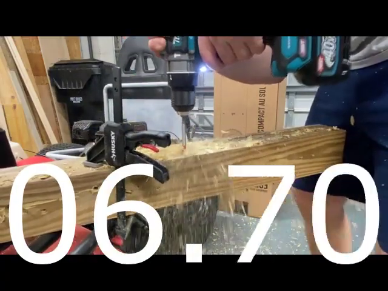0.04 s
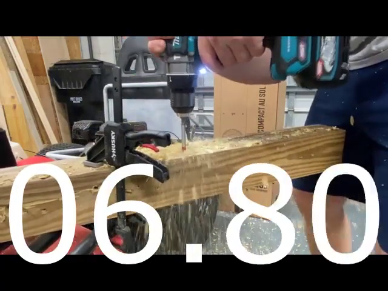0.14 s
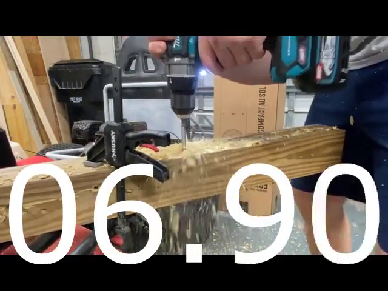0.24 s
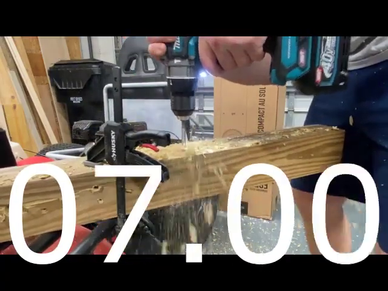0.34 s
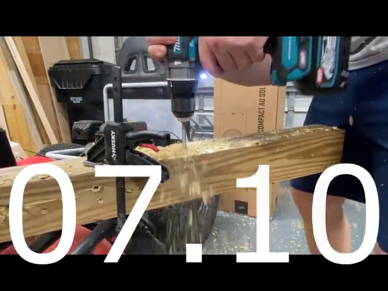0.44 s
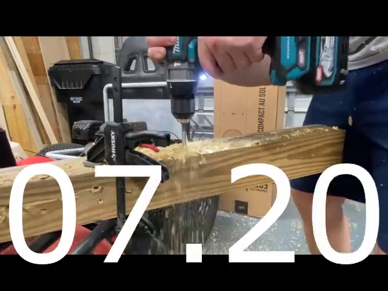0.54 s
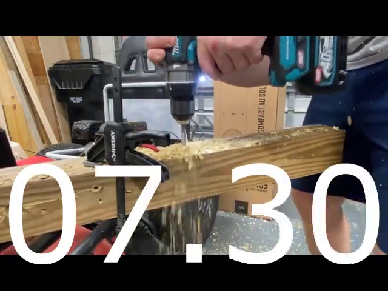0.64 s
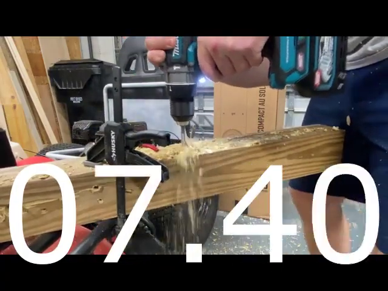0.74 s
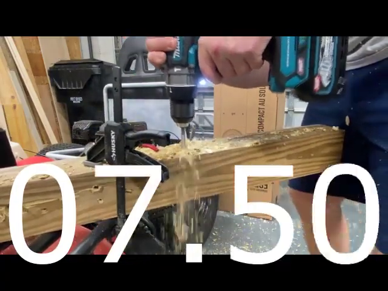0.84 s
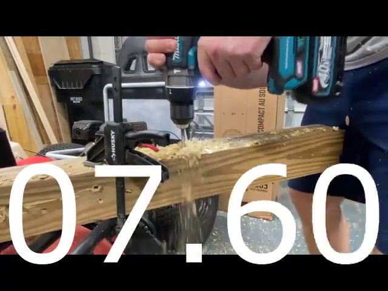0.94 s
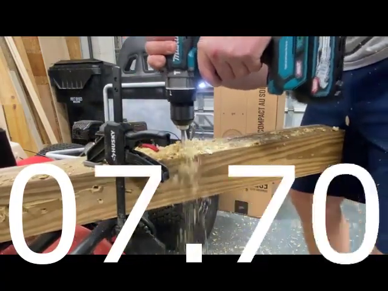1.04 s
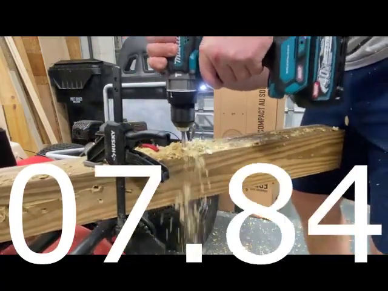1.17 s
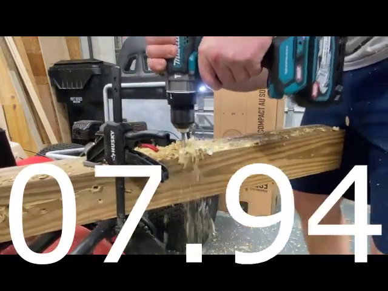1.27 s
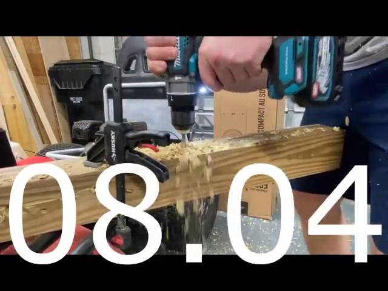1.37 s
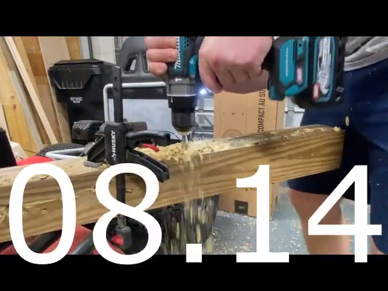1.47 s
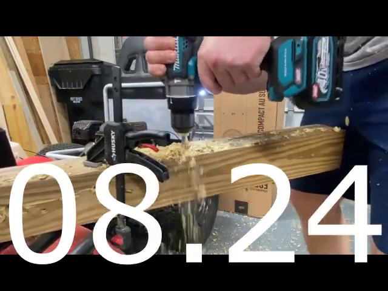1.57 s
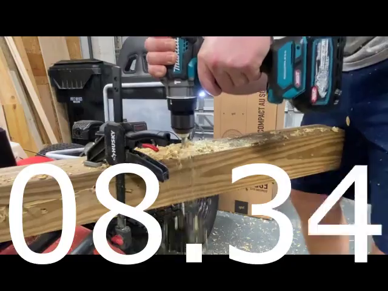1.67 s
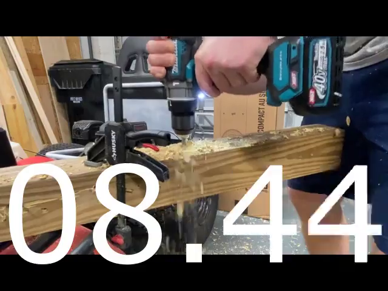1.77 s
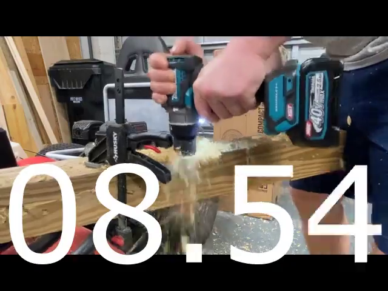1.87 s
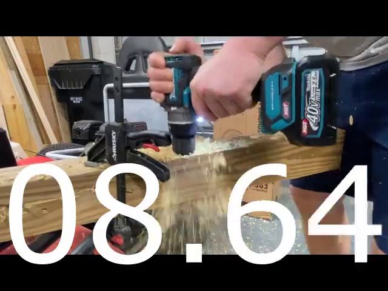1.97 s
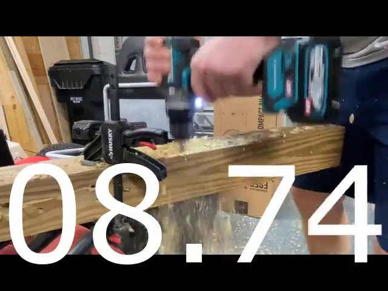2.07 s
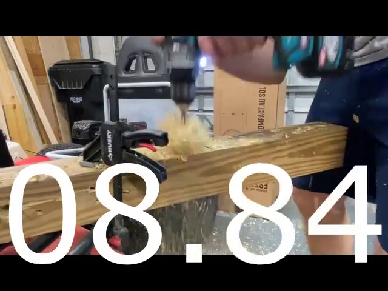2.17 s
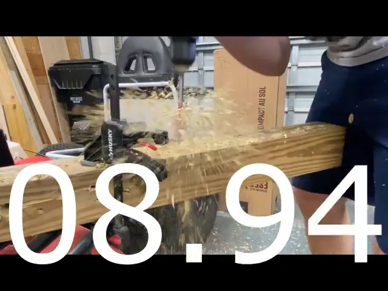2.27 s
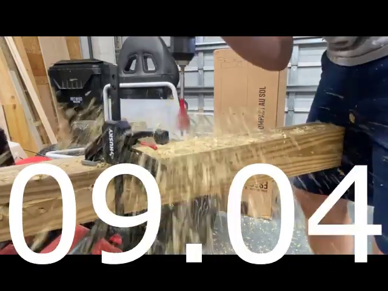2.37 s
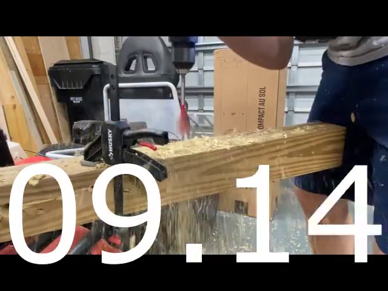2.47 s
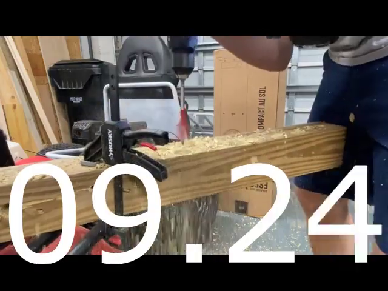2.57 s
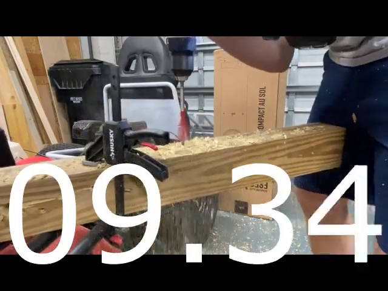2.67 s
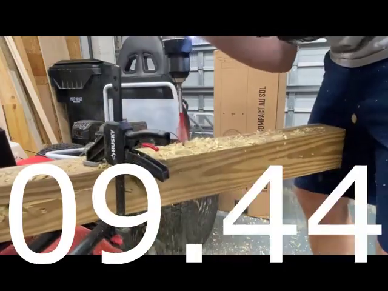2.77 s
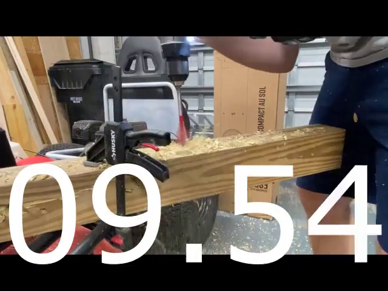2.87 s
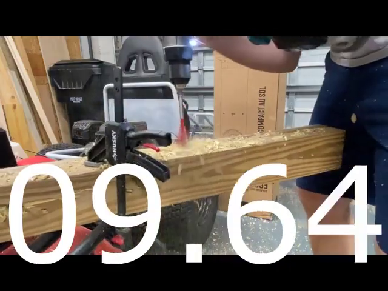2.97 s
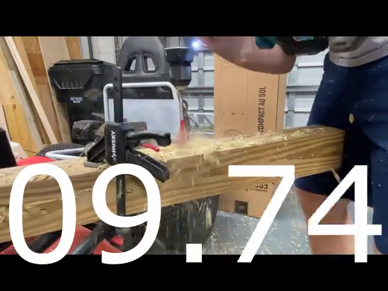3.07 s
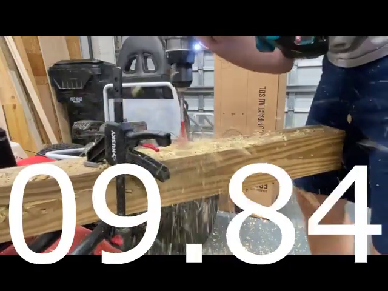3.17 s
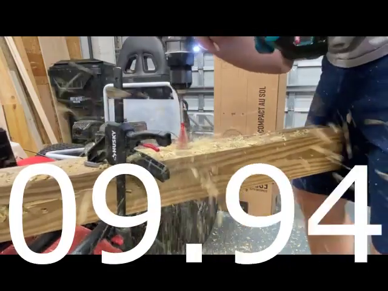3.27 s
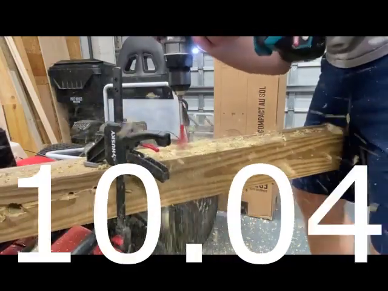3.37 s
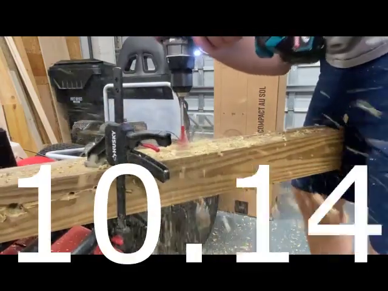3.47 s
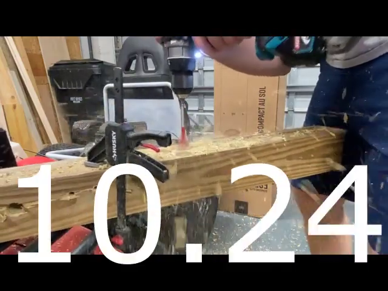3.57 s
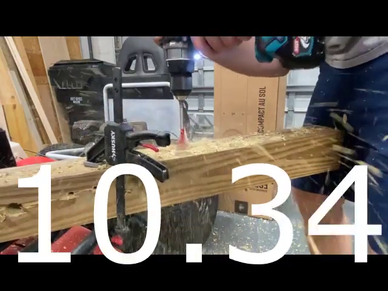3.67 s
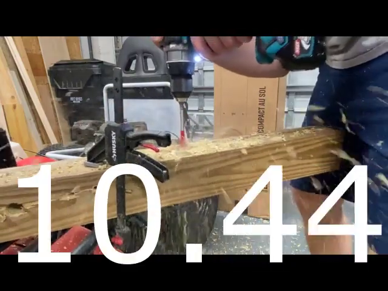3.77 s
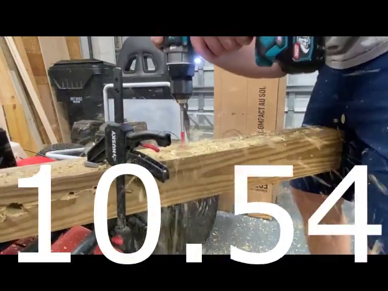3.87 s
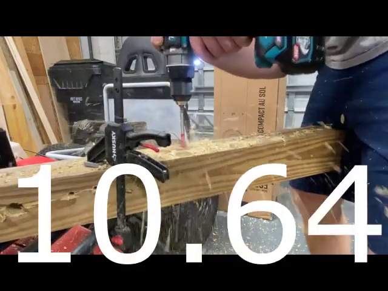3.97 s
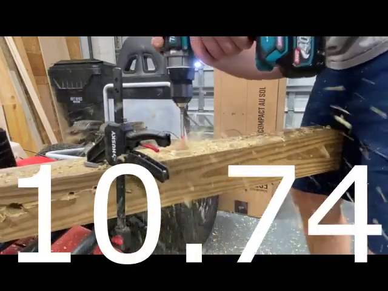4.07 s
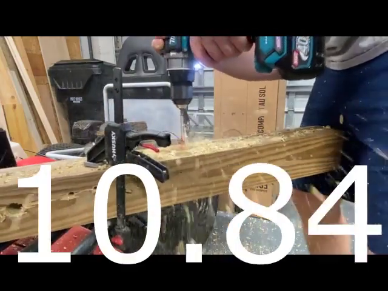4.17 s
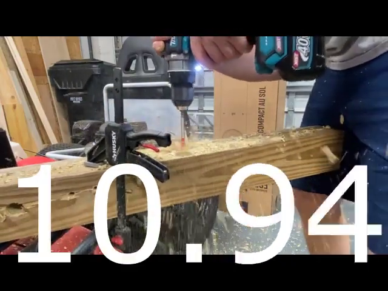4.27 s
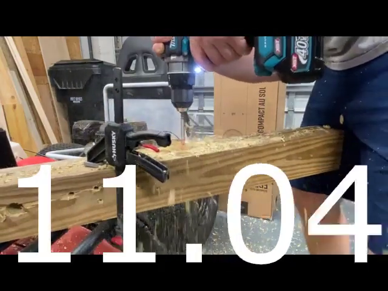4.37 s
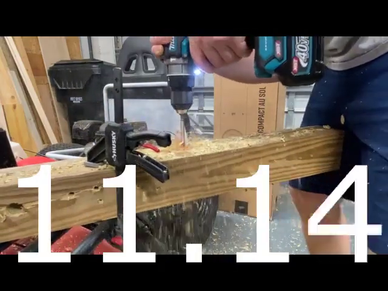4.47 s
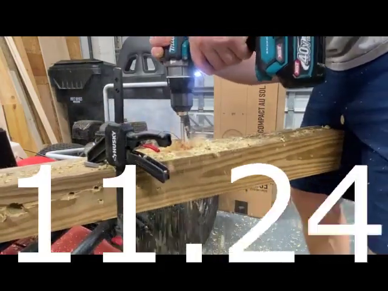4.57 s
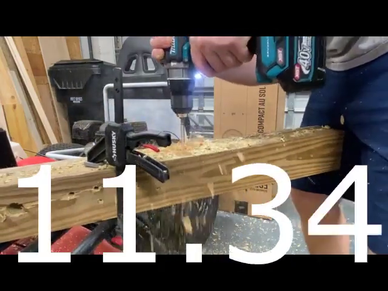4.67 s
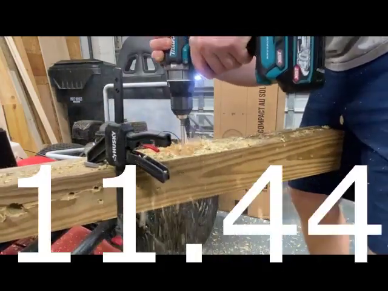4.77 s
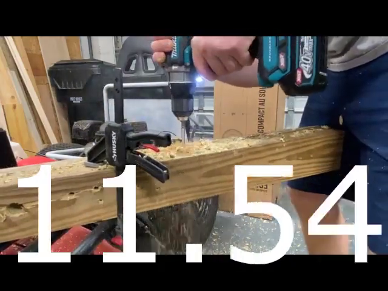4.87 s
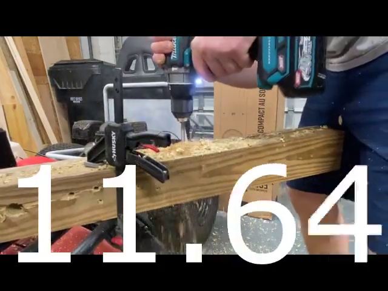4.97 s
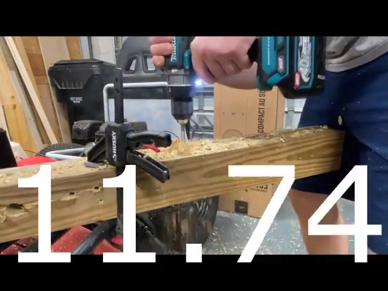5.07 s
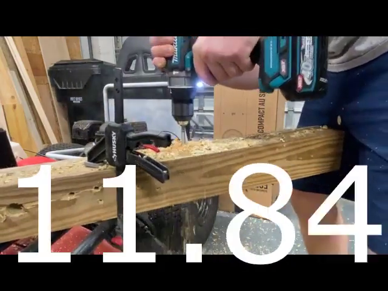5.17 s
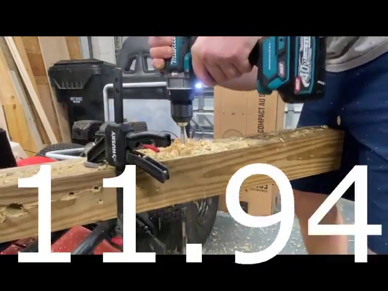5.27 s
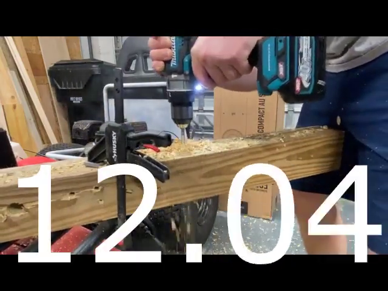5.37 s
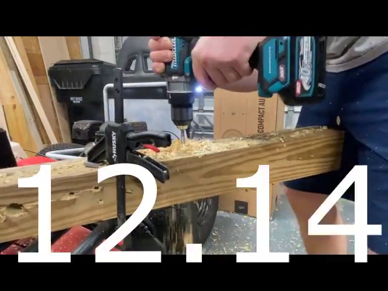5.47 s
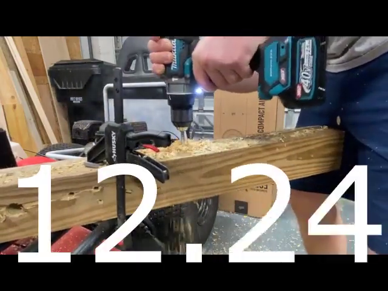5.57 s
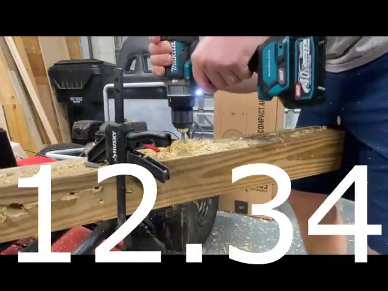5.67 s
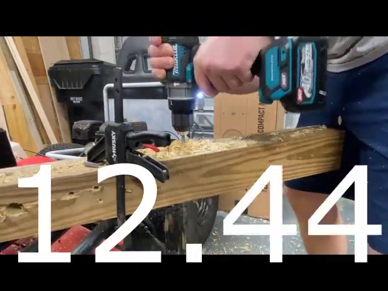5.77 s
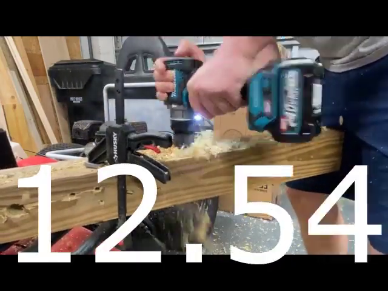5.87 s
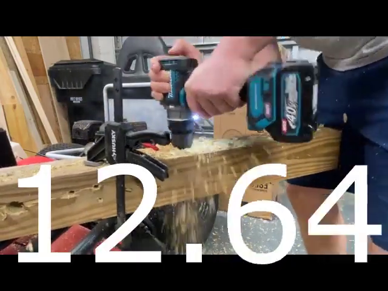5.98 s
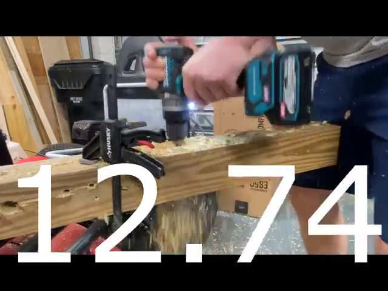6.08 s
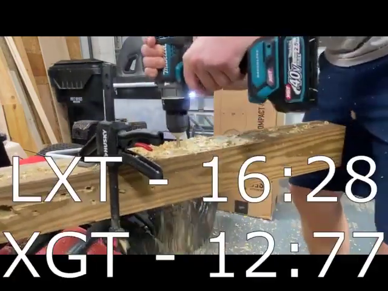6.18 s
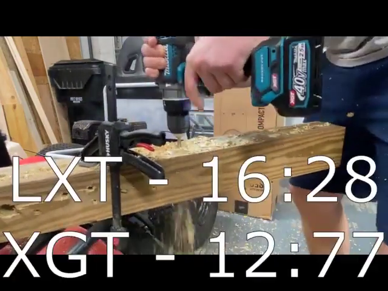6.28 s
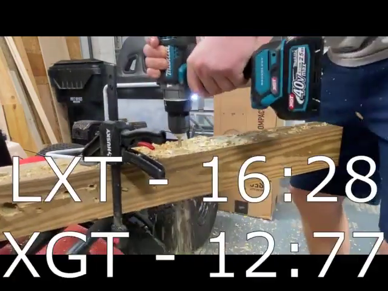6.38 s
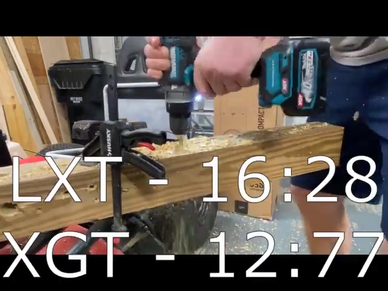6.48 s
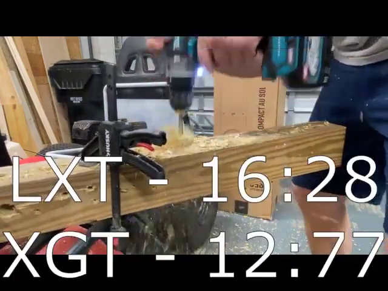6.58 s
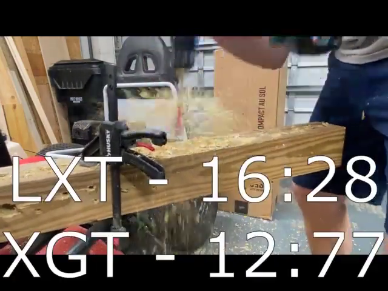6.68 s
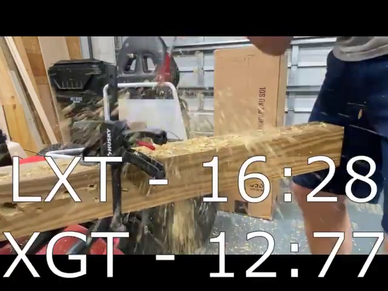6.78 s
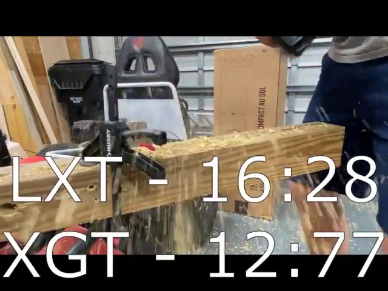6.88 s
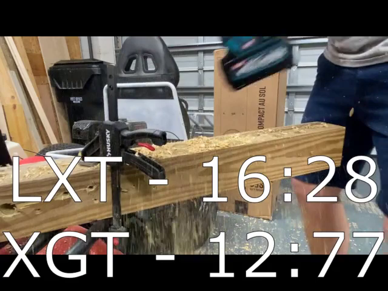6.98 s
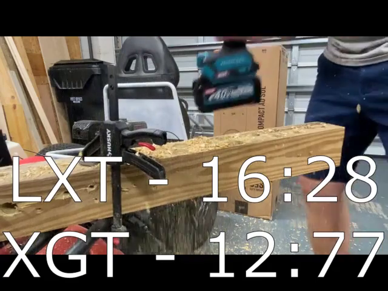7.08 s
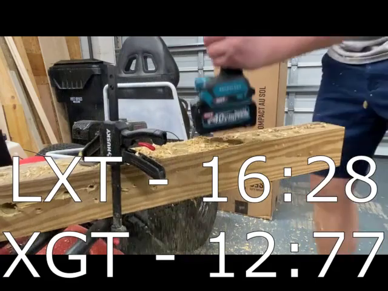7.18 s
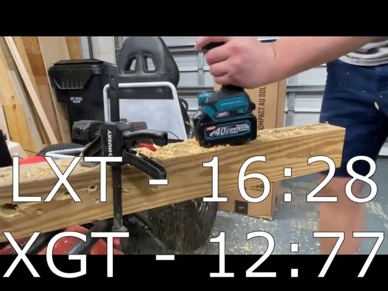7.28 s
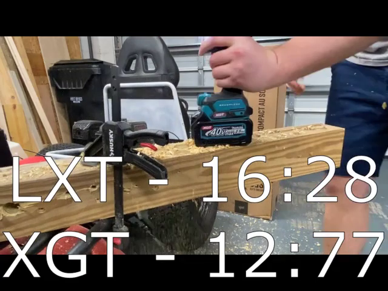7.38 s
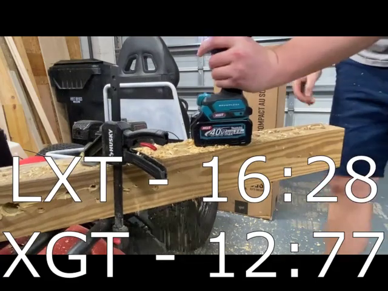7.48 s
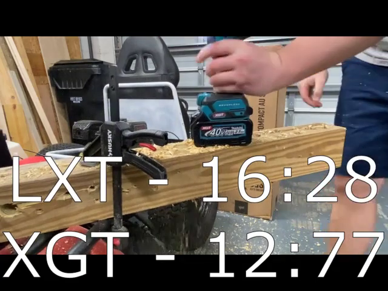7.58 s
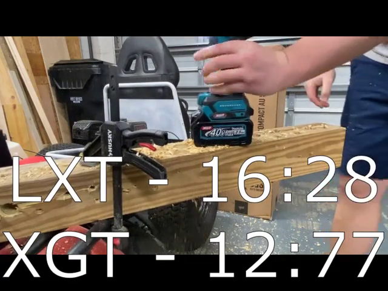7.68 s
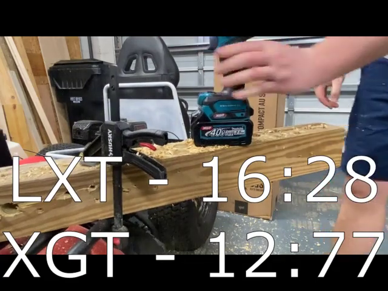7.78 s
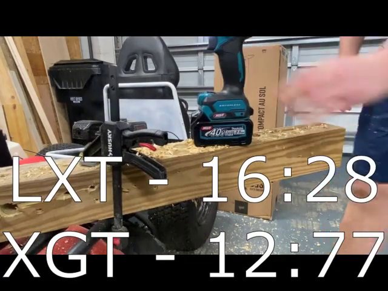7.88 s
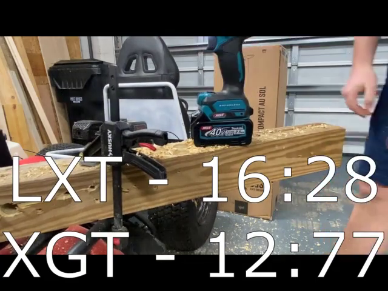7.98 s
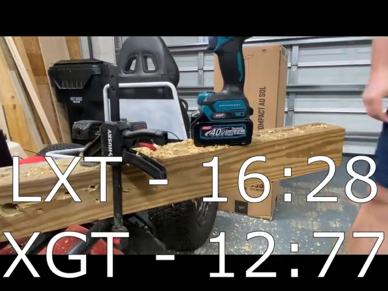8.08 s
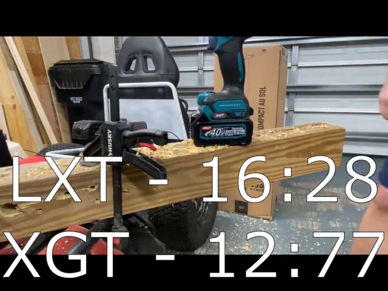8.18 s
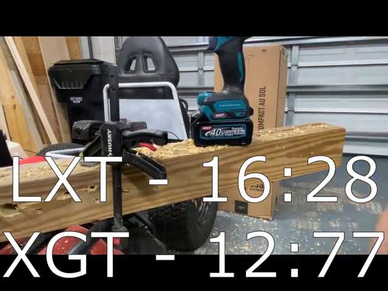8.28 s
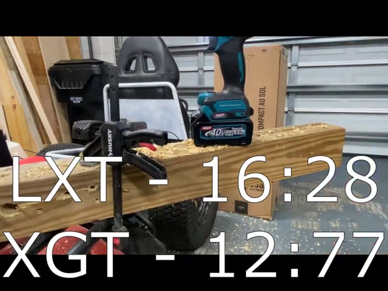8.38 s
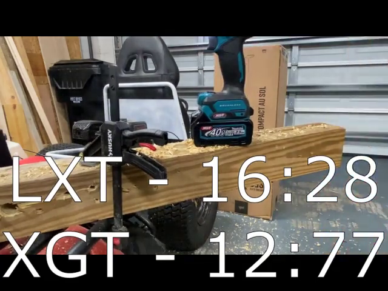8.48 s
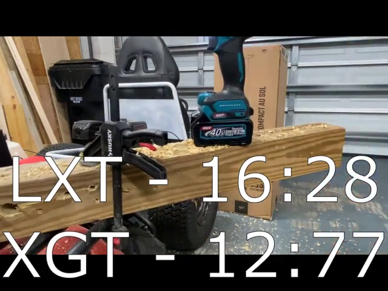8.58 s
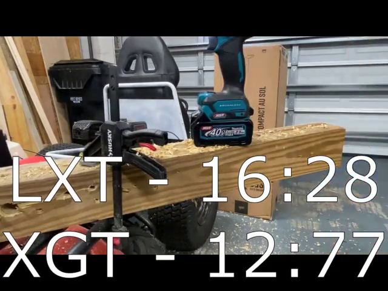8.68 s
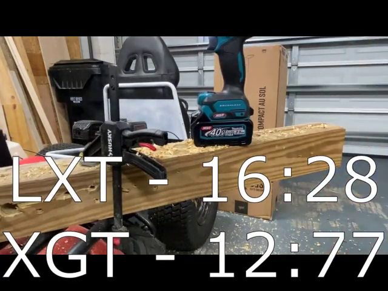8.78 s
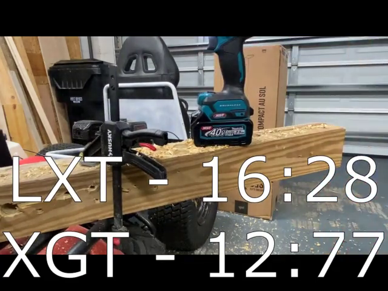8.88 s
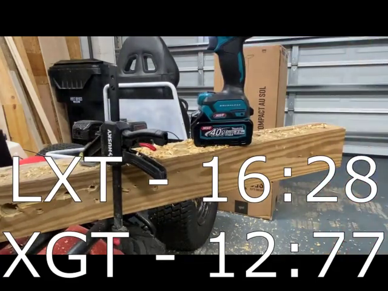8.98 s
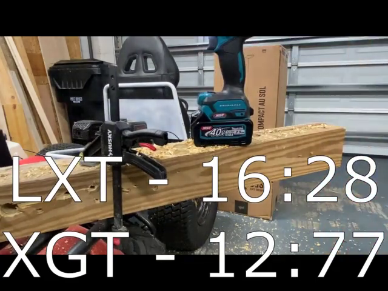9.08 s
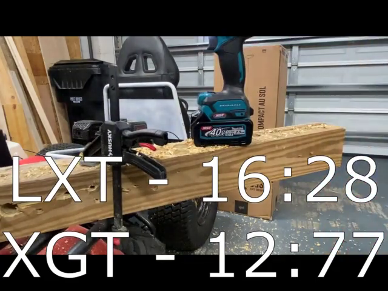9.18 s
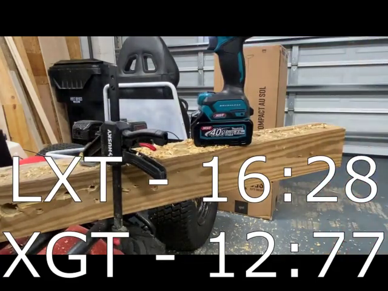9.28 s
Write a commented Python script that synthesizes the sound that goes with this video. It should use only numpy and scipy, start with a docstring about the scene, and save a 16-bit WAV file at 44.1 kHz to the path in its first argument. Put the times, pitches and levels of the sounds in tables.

```python
"""Cordless drill in a garage

A drill bores through a clamped wooden beam twice, the first hole already begun, close to an overloaded
microphone. Motor and gear tones follow one shaft angle, and the gears whine as load drags the motor down.
Crackling noise through wood resonances is the cutting, and the chatter at breakthrough and withdrawal.
Then the drill is stood on the beam in filtered knocks, and shoes scuff away in swells of gritty noise."""
import sys
import numpy as np
from scipy import signal
from scipy.fft import rfft, irfft, next_fast_len
from scipy.io import wavfile
from scipy.ndimage import uniform_filter1d

SR = 44100
rng = np.random.default_rng(int(sys.argv[2]) if len(sys.argv) > 2 else 0)


def log_audio(samples):
    """Write samples as a 16-bit WAV file to the path given in sys.argv[1]."""
    # one column per channel
    frames = np.atleast_2d(samples).T
    # limit to full scale, then quantise
    limited = np.clip(frames, -1, 1)
    pcm = np.round(limited * 32767).astype(np.int16)
    wavfile.write(sys.argv[1], SR, pcm)


N = 411453
T = np.arange(N) / SR


def amp(db):
    """Decibels to gain."""
    return 10 ** (np.asarray(db) / 20)


def unit(x):
    """Scales to rms 1."""
    return x / np.sqrt(np.mean(x ** 2) + 1e-20)


def read(points, hz):
    """Reads a curve on a log-frequency axis."""
    f, value = np.transpose(points)
    return np.interp(np.log(hz + 1), np.log(f + 1), value)


def add(mix, s, sound):
    """Mixes a sound in at a time."""
    part = mix[max(round(s * SR), 0):][:len(sound)]
    part += sound[:len(part)]


def colour(x, spectrum, rings=()):
    """Filters by a broad spectrum with resonances standing on it; rms 1."""
    size = next_fast_len(N + SR)
    f = np.fft.rfftfreq(size, 1 / SR)
    peaks = 1
    for hz, width, db in rings:
        peaks = peaks + amp(db) ** 2 / (1 + (2 * (f - hz) / width) ** 2) ** 0.91447
    filtered = rfft(x, size) * amp(read(spectrum, f)) * np.sqrt(peaks)
    return unit(irfft(filtered, size)[:N])


def band(x, hz, spread, order=3):
    """A broad causal band around hz."""
    edges = [hz / (1 + spread), min(hz * (1 + spread), SR / 2 - 2000)]
    return signal.sosfilt(signal.butter(order, edges, "band", fs=SR, output="sos"), x)


def wander(rate_hz):
    """Smooth chance of rms 1."""
    lowpass = signal.butter(2, rate_hz, fs=SR, output="sos")
    return unit(signal.sosfilt(lowpass, rng.standard_normal(N)))


def grains(per_s, spread_db):
    """Random impulses, most small and a few large."""
    size = amp(spread_db * np.minimum(rng.exponential(1, N), 4)) * rng.standard_normal(N)
    return unit(size * (rng.random(N) < per_s / SR))


def swell(s, rise, fall, db):
    """A gain that climbs to its peak at s and dies away."""
    climb = np.maximum((s - T) / rise, 0) ** 4
    decay = np.maximum((T - s) / fall, 0) ** 2
    return amp(db) * np.exp(-climb - decay)


# the two holes, the first already begun:
# (start [s], end [s], relative cutting level [dB], relative gear whine level [dB])
HOLES = [(-2, 1.785, -5.5, -13.3), (2.905, 5.772, -5.2, -15)]
BITE_S, LET_GO_S = 0.02596, 0.028  # the edges sink in, and come free


def in_wood(start, end):
    """One while the edges cut a hole, ramping to zero outside."""
    return np.clip((T - start) / BITE_S, 0, 1) * np.clip((end - T) / LET_GO_S, 0, 1)


# decay of the room by pitch: (frequency [Hz], t60 [s])
GARAGE_DECAY = [(150, 0.8795), (500, 0.58944), (1500, 0.7178), (4000, 0.47208), (8000, 0.43977),
                (15000, 0.32)]


def reverb(x):
    """One diffuse tail from the hard walls, the treble dying first."""
    hz, t, z = signal.stft(rng.standard_normal(SR), SR, nperseg=256)
    decay = amp(-60 * t / read(GARAGE_DECAY, hz)[:, None])
    tail = signal.istft(z * decay, SR, nperseg=256)[1]
    # silent for the first 3 ms, then a quick ramp
    tail = tail * np.clip((np.arange(len(tail)) / SR - .003) / 0.0024, 0, 1)
    middle = abs(rfft(tail, SR)[500:6000])  # one bin per Hz; sets the tail's gain
    return signal.oaconvolve(x, tail / np.sqrt(np.mean(middle ** 2)))[:N]


def garage(x, count=3):
    """The drill and the person move, so the paths to the walls keep changing: several tails take turns."""
    walls = np.zeros(N)
    for k in range(count):
        walls += reverb(x * np.cos(np.pi * (2 * T + k / count)))
    return walls / np.sqrt(count / 2)


# spectrum of the still air: (frequency [Hz], relative density [dB per Hz])
AIR_SPECTRUM = [(15, -31.5), (25, -1.5), (75, -13.5), (126, -20.5), (221, -13.5), (267, -22.5),
                (322, -20.5), (598, -19.5), (1380, -33.5), (5280, -35), (15500, -53)]
# low rumbles as the person shifts and walks off: (time [s], rise [s], fall [s], relative level [dB])
RUMBLES = [(7.0, .15, 0.5856, -41), (9.15, 0.3047, 0.4577, -46)]


def background(air_db=-55, still_db=-49, shake_db=-38.5, hum_db=-45.5):
    """Still air, a low rumble that grows while the bit shakes the beam, and a low hum that comes up at the end."""
    air = amp(air_db) * colour(rng.standard_normal(N), AIR_SPECTRUM)
    low_spectrum = [(5, -6.0), (20, 5.0), (45, -6), (90, -12), (160, -28), (400, -56)]
    low = colour(rng.standard_normal(N), low_spectrum)
    # a narrow band of noise, so the hum wavers
    hum_spectrum = [(60, -40), (78, -8), (85, -1.5), (92, -9.5), (120, -45), (400, -90.5)]
    hum = colour(rng.standard_normal(N), hum_spectrum)
    shaking = amp(still_db) + amp(shake_db) * sum(in_wood(*hole[:2]) for hole in HOLES)
    shaking = shaking + sum(swell(*row) for row in RUMBLES)
    return air + shaking * low + amp(hum_db) * hum * np.clip((T - 8.7) / 0.375, 0, 1)


# scrapes of battery and shoes:
# (time [s], rise [s], fall [s], relative level [dB], centre [Hz], relative half-width [ratio])
SCUFFS = [(7.21, 0.029, 0.0783, -39.5, 2548, 1), (7.22, 0.02335, .09, -39, 140, .9),
          (7.21, 0.01446, 0.05774, -37, 624.4, 0.353), (7.295, 0.01934, 0.02632, -31.5, 2128, 0.251),
          (7.3, 0.0413, 0.1026, -34.5, 616.3, 0.7736), (7.35, 0.0606, 0.1676, -48.5, 1970, 0.4784),
          (8.14, 0.04562, 0.05886, -48.5, 1720, 0.863), (8.14, .05, 0.0807, -51.5, 5200, 0.7576),
          (8.86, 0.0759, 0.06885, -43.5, 580, .6), (8.87, 0.07355, 0.0964, -49.5, 3987, 0.787),
          (8.92, 0.1377, 0.0964, -50.5, 1694, 0.691), (9.12, 0.01425, 0.04516, -54.5, 4469, 0.721)]


def scuffs(uneven_db=2.0):
    """Gritty sliding that swells, catches and dies away."""
    catching = amp(uneven_db * wander(35.27))
    out = np.zeros(N)
    for s, rise, fall, db, hz, spread in SCUFFS:
        grit = unit(band(grains(3000, 2.421) * catching, hz, spread))
        out += swell(s, rise, fall, db) * grit
    return out


def hits(rows, t60, spread, order, edge):
    """Short blows: a sharp edge and a quickly dying rattle in one broad band."""
    out, t = np.zeros(N), np.arange(4096) / SR
    for s, db, hz in rows:
        blow = rng.standard_normal(len(t)) * amp(-60 * t / t60)
        blow[0] = edge
        blow = band(blow, hz, spread, order)
        add(out, s, amp(db) * blow / abs(blow).max())
    return out


# knocks of the battery on the beam and of things underfoot:
# (time [s], relative peak level [dB], centre [Hz])
KNOCKS = [(7.200, -19.5, 588.3), (7.292, -17, 1410), (7.303, -21, 789), (7.399, -38, 1510),
          (7.699, -23, 2016), (7.700, -29.5, 600), (8.125, -24.5, 1605), (8.965, -30, 1600),
          (9.108, -18.5, 1330)]


def knocks():
    """Solid contact: a heavy first edge with a short broad rattle."""
    return hits(KNOCKS, t60=0.0194, spread=0.874, order=3, edge=32.06)


# clicks of trigger, chuck and handling: (time [s], relative peak level [dB], centre [Hz])
CLICKS = [(2.039, 3, 4168), (6.039, -20, 3176), (6.075, -20, 4000), (6.161, -23, 4000), (6.204, -24, 3188),
          (6.323, -23.5, 5083), (6.342, -22, 4200), (6.360, -4, 3744), (6.372, -3.5, 3200),
          (6.752, 6, 4185), (6.760, 6.5, 4120), (6.817, -0.5, 4188), (6.824, 9, 4026), (6.838, -8.5, 4000),
          (7.179, -19, 4470), (7.699, -35.5, 5000), (8.072, -34.5, 5000), (8.125, -33, 4000),
          (8.779, -40, 3494)]


def clicks():
    """Small hard parts snap together with a bright, short rattle."""
    return hits(CLICKS, t60=0.02, spread=0.7563, order=2, edge=3.0)


# showers of wood chips: (time [s], rise [s], fall [s], relative level [dB])
CHIP_SHOWERS = [(6.039, 0.1028, .2, -41), (6.92, .05, 0.262, -44), (7.3, 0.1405, 0.19975, -44.5),
                (7.72, 0.03573, 0.0813, -53)]
# colour of their patter: (frequency [Hz], relative density [dB per Hz])
PATTER_SPECTRUM = [(500, -19.5), (2000, -3), (4000, 2.5), (6500, -3.5), (9000, -14.5), (15000, -21.5)]


def falling_chips():
    """Light chips land one by one on beam and floor."""
    return sum(swell(*shower) for shower in CHIP_SHOWERS) * colour(grains(1200, 2.2), PATTER_SPECTRUM)


# the drill lurches down as the bit breaks through and thumps the beam:
# (time [s], rise [s], fall [s], relative level [dB])
THUMPS = [(1.8, .04, .055, -30), (5.79, 0.027, 0.066, -27)]


def thumps(centre_hz=140, spread=0.8):
    """The clamped beam shudders with a dull, low boom."""
    boom = unit(band(rng.standard_normal(N), centre_hz, spread))
    return sum(swell(*row) for row in THUMPS) * boom


# the steel bit sings on after each jolt: (time [s], frequency [Hz], level [dB], t60 [s])
BIT_MODES = [(1.76, 980.9, -22, 1.02), (1.77, 1360, -45.5, 0.91), (2.11, 1393, -16.5, 0.85),
             (2.11, 540, -7.5, 0.34), (2.15, 995, -15, 0.61), (5.755, 1743, -13, .35),
             (5.755, 2060, -16.5, 0.5), (5.788, 1180, -33.5, 2.6), (6.832, 1190, -51, 1.4)]


def bit_ring():
    """Bending modes of the free bit: decaying sines, each faded out within a second."""
    out, t = np.zeros(N), np.arange(SR) / SR
    fade = signal.windows.tukey(SR, .02)
    for s, hz, db, t60 in BIT_MODES:
        add(out, s, amp(db - 60 * t / t60) * np.sin(2 * np.pi * hz * t) * fade)
    return out


# the bit jerking in the hole at breakthrough and withdrawal:
# (time [s], rise [s], fall [s], relative level [dB])
CHATTER = [(1.66, .06, .035, -9.5), (1.735, 0.0242, 0.07859, -2.5), (2.051, .013, 0.029095, 0.5),
           (2.108, 0.01266, 0.02303, -1.5), (5.757, 0.017, 0.02086, -1), (6.422, 0.03624, .085, 2),
           (6.6, 0.0595, 0.0189, -9.5)]
# broad colour of the beam: (frequency [Hz], relative density [dB per Hz])
BEAM_SPECTRUM = [(25, -50), (60, -34), (150, -20), (280, -12.5), (420, -4.5), (600, -6), (950, -2),
                 (1400, -3.5), (2200, -3.5), (3200, -4.5), (4600, -3.5), (6500, -8), (9000, -14),
                 (15000, -24.5)]
# resonances of the beam: (frequency [Hz], nominal width [Hz], height over that colour [dB])
BEAM_RINGS = [(388.6, 120, 0.5), (556.5, 70, 6), (585.74, 23, 9), (727.06, 70, 7), (918.74, 42, 9),
              (1375.1, 46, 6), (1389.4, 40, 3), (1720, 110, 5)]


def chatter(bite, chatter_db=0, throb=0.14, lumpy_db=1.5):
    """The edges catch unevenly on the wall of the hole and hammer the beam."""
    blows = grains(2500, 2.6) * (1 + throb * bite) * amp(lumpy_db * wander(50))
    bouts = sum(swell(*bout) for bout in CHATTER)
    return amp(chatter_db) * bouts * colour(blows, BEAM_SPECTRUM, BEAM_RINGS)


# the bit snags and the motor sags: (time [s], length [s], sag [Hz])
SNAGS = [(1.331, .09, 11), (2.126, .08, 42), (3.35, .085, 46), (3.777, .025, 38), (5.523, .05, 29)]


def sag():
    """Speed lost to snags, in Hz."""
    return sum(hz * np.exp(-((T - s) / length) ** 2) for s, length, hz in SNAGS)


# trigger pulls, the first already held at the start: (press [s], release [s])
TRIGGER_PULLS = [(-2, 5.755), (6.5, 6.795)]
# base motor speed as the bit sinks, breaks through, spins free and sinks again:
# (time [s], turns a second [Hz])
MOTOR_SPEED = [(0, 355.9), (1.46, 354.1), (1.78, 392.3), (1.88, 449.2), (2.02, 482.4), (2.42, 486.7),
               (2.81, 491.2), (2.95, 439.8), (3.25, 410.1), (3.7, 408.7), (4.38, 452.1), (4.9, 395.1),
               (5.22, 370.5), (5.42, 389.6), (5.6, 384.9), (5.76, 365.6), (6.48, 377.4), (6.72, 471.5)]
FREE_HZ, GEAR_RATIO = 493.27, 16.3  # unloaded motor speed; motor turns for one turn of the bit
SPIN_UP_S, BRAKE_S = .009, .06  # time constants of the motor


def rotation(sway=.021, stray=.006):
    """Motor angle in turns, load 0-1, running 0-1, and the bite of the two cutting edges."""
    speed = np.interp(T, *np.transpose(MOTOR_SPEED)) - sag()
    load = np.clip((FREE_HZ - speed) / 135, 0, 1)
    spun = np.zeros(N)
    for press, release in TRIGGER_PULLS:
        spin_up = 1 - np.exp(-np.maximum(T - press, 0) / SPIN_UP_S)
        spun += spin_up * np.exp(-np.maximum(T - release, 0) / BRAKE_S)
    bit_angle = 2 * np.pi * np.cumsum(speed * spun) / SR / GEAR_RATIO
    bite = np.cos(2 * bit_angle)  # the edges cross the grain twice a turn
    # the drag changes within each turn of the bit, so the loaded motor warbles
    warble = sway * np.sin(bit_angle + .55 * wander(5)) + .011 * bite + stray * wander(60)
    speed = speed * spun * (1 - load * warble + .0008 * wander(15))
    return np.cumsum(speed) / SR, load, spun ** 2, bite


# rattling gears and cooling air: (frequency [Hz], relative density [dB per Hz])
WHIRR_SPECTRUM = [(60, -22), (150, -17), (190, -30), (260, -18.5), (500, -18), (1000, -11.5), (1600, -12),
                  (2400, -9.5), (3300, -1.5), (4000, 3), (5200, 0), (7000, -8), (10000, -22.5),
                  (15500, -18)]


def whirr(turns, bite, whirr_db=-17.0, flutter=0.25):
    """Rattling gears and cooling air, pulsing with the shaft and the bit."""
    shaft_pulse = 1 + 0.26 * np.cos(2 * np.pi * turns)
    rattle = grains(6000, 2.) * (1 + flutter * bite) * shaft_pulse
    return amp(whirr_db) * colour(rattle, WHIRR_SPECTRUM)


# tones of motor and fan: (multiple of the motor speed [ratio], relative level [dB])
MOTOR_TONES = [(1, -28), (2, -45), (4, -33.5), (8, -40), (16, -44), (23, -45)]
# the whistle swells as the free drill is lifted: (time [s], rise [s], fall [s], added gain [dB])
WHISTLE = (2.44, .17, .21, 3.5)
TONE_LOAD_DB = -17.5  # the motor's own tones sink under full load


def motor_tones(turns, load, tone_db=-1.5, waver=0.11, whistle_order=4):
    """Clean tones of shaft, magnets and fan, strongest when the bit spins free."""
    tones = np.zeros(N)
    for k, db in MOTOR_TONES:
        tone = amp(db) * np.sin(2 * np.pi * k * turns) * (1 + waver * wander(25))
        if k == whistle_order:
            tone = tone * (1 + swell(*WHISTLE))
        tones += tone
    return amp(tone_db + TONE_LOAD_DB * load) * np.sqrt(2) * tones


# tooth-mesh tones of the gears: (multiple of the motor speed [ratio], relative level [dB])
GEAR_MESH = [(7.6, -3.5), (12, -2), (14.7, -14.5), (18.2, -9.5)]
# resonances of the gear case: (frequency [Hz], boost [dB])
GEARCASE = [(2400, 1.5), (2750, -2), (3300, 4), (3900, -10), (4280, 6), (4480, 2.5), (4750, 1), (5050, 0.5),
            (5380, 11), (5750, -3), (6500, -5.5), (8500, -16.5)]
WHINE_LOAD_DB, IDLE_WHINE_DB = 20.5, -21  # rise from no load to full load; relative level outside the holes
SNAG_WHINE_DB_PER_HZ = 0.1236  # a snag presses the teeth harder together
JERK_DB, JERK_DELAY_S, JERK_S = 19, 0.035, .01  # the gears slam together just after the motor starts


def gears(turns, load, rough=0.26, patchy_db=1.6528):
    """The meshing teeth sing out with the load, most where their pitch crosses the resonances of the gear case."""
    speed = np.gradient(turns) * SR
    out = np.zeros(N)
    for k, db in GEAR_MESH:
        tooth = np.sin(2 * np.pi * k * turns + rough * wander(180)) * (1 + 0.35 * wander(47))
        out += amp(db + read(GEARCASE, k * speed)) * tooth
    steady_db = IDLE_WHINE_DB
    for start, end, _, db in HOLES:
        steady_db = steady_db + (db - IDLE_WHINE_DB) * in_wood(start, end)
    jerks = sum(np.exp(-((T - press - JERK_DELAY_S) / JERK_S) ** 2) for press, _ in TRIGGER_PULLS)
    # the second hole is knottier
    snag_db = (SNAG_WHINE_DB_PER_HZ * sag() + patchy_db * wander(19)) * in_wood(*HOLES[1][:2])
    whine_db = steady_db + JERK_DB * jerks + snag_db - WHINE_LOAD_DB * (1 - load)
    return amp(whine_db) * np.sqrt(2) * out


def rasp(turns, load, rasp_db=-21, width_hz=170):
    """In the second hole the lowest mesh tone smears into a rasp that rides on the speed."""
    smeared = wander(width_hz) * np.sin(2 * np.pi * GEAR_MESH[0][0] * turns)
    return amp(rasp_db) * in_wood(*HOLES[1][:2]) * load * smeared


# colour of the cutting, one list a hole: (frequency [Hz], relative density [dB per Hz])
CUTTING_SPECTRA = [
    [(60, -16), (130, -17.5), (220, -16), (300, -10), (500, -3), (800, -7), (1400, -1), (2300, -5.5),
     (3500, 1.5), (4700, -2), (5600, 5.5), (7000, -4), (9500, -13), (15000, -20.5)],
    [(60, -23.5), (130, -12.5), (220, -15), (300, -9), (500, -7), (800, -1.5), (1400, 1.5), (2300, -2),
     (3300, 6), (4200, -1.5), (5700, 6.5), (7200, -4), (9500, -10.5), (15000, -20)],
]
# resonances of bit and beam, one list a hole:
# (frequency [Hz], nominal width [Hz], height over the cutting noise when fully pressed [dB])
CUTTING_RINGS = [
    [(215.57, 20, 13), (494.47, 19, 8.5), (986.56, 44, 20), (1390, 60, -5), (1772.4, 45, 8.5),
     (2035, 50, 7), (2695, 60, 3.5)],
    [(140, 18, 9), (243, 25, 11), (503.07, 32, 10.5), (961.92, 50, 13), (1330, 60, 0.5), (1707.8, 39, 12.5),
     (2063.2, 45, 3.5), (3242.3, 260, 5), (5370, 120, -7.5)],
]
# cutting grows with the load, and is louder while the bit tears the surface
CUT_LOAD_DB, ENTRY_DB, ENTRY_S = 4, 3.5, 0.55


def cutting(bite, load, cut_db=-3.0, throb=0.38, ringing=0.42):
    """Fibres snap in a dense crackle, throbbing twice a turn; the harder the bit is pressed, the more it rings."""
    out = np.zeros(N)
    press = np.clip(1 - ringing * (1 - load), 0, 1)
    for (start, end, hole_db, _), chips, rings in zip(HOLES, CUTTING_SPECTRA, CUTTING_RINGS):
        snaps = grains(9000, 1.8) * (1 + throb * bite)
        wood = press * colour(snaps, chips, rings) + (1 - press) * colour(snaps, chips)
        entry_db = ENTRY_DB * np.exp(-np.maximum(T - start, 0) / ENTRY_S)
        effort_db = entry_db - CUT_LOAD_DB * (1 - load)
        out += amp(cut_db + hole_db + effort_db) * in_wood(start, end) * wood
    return out


def scene(direct_db=-2, wood_wet_db=-4, whine_wet_db=-8, tone_wet_db=-12,
          click_wet_db=-7, knock_wet_db=-5, scuff_wet_db=-2):
    """Drill, wood and handling noises in the garage; the motor tones are the driest of the sends."""
    turns, load, running, bite = rotation()
    tones = running * motor_tones(turns, load)
    whine = running ** 2 * gears(turns, load)
    boring = running * whirr(turns, bite) + rasp(turns, load) + cutting(bite, load)
    boring = boring + chatter(bite) + thumps() + falling_chips()
    sends = [(boring, wood_wet_db), (whine, whine_wet_db), (tones, tone_wet_db),
             (clicks(), click_wet_db), (knocks(), knock_wet_db), (scuffs(), scuff_wet_db)]
    direct = amp(direct_db) * sum(x for x, _ in sends)
    walls = garage(sum(amp(db) * x for x, db in sends))
    return (direct + walls + bit_ring() + background())[None]


def record(dry, drive_db=0.2, limit=1.0, ceiling=0.96187, knee=6, low_cut_hz=55, top_hz=15800):
    """A fast limiter holds the loudest bursts, overload rounds the remaining peaks; then low cut and band limit."""
    x = amp(drive_db) * dry
    power = uniform_filter1d(x ** 2, size=200)  # about 5 ms
    x = x / (1 + (power / limit ** 2) ** 4) ** (1 / 8)
    clipped = x / (1 + abs(x / ceiling) ** knee) ** (1 / knee)
    low_cut = signal.butter(1, low_cut_hz, "high", fs=SR, output="sos")
    clipped = signal.sosfilt(low_cut, clipped)
    band_limit = signal.firwin(511, top_hz, window=("kaiser", 9), fs=SR)
    return signal.oaconvolve(clipped, band_limit[None], "same")


dry = scene()
out = record(dry)
log_audio(out)
```